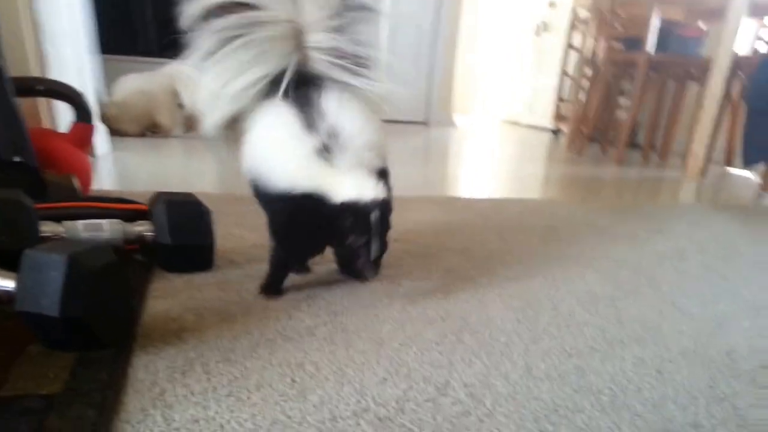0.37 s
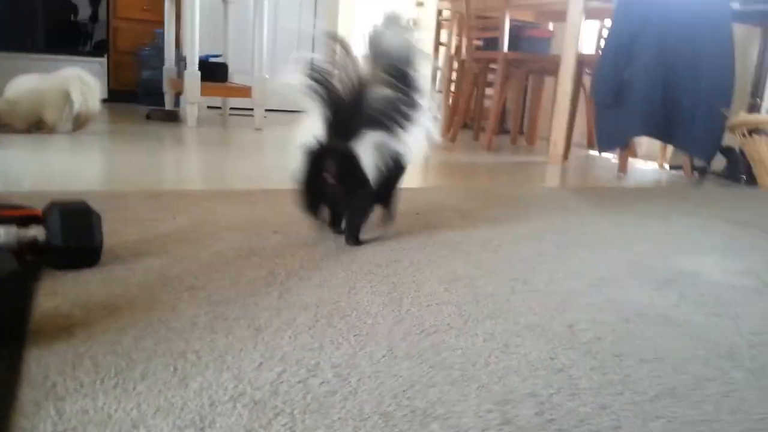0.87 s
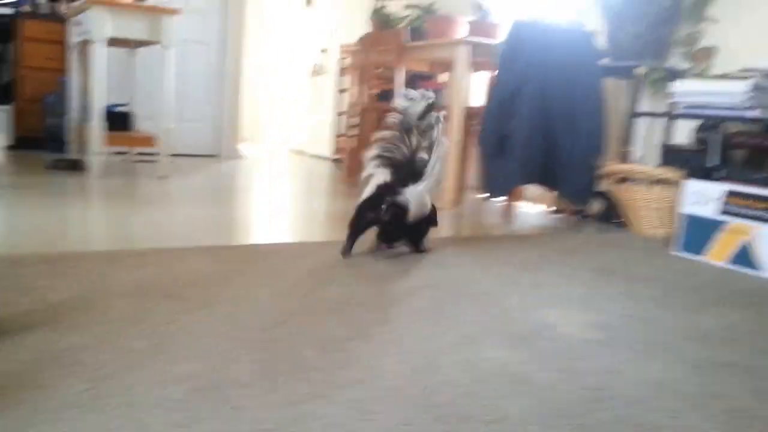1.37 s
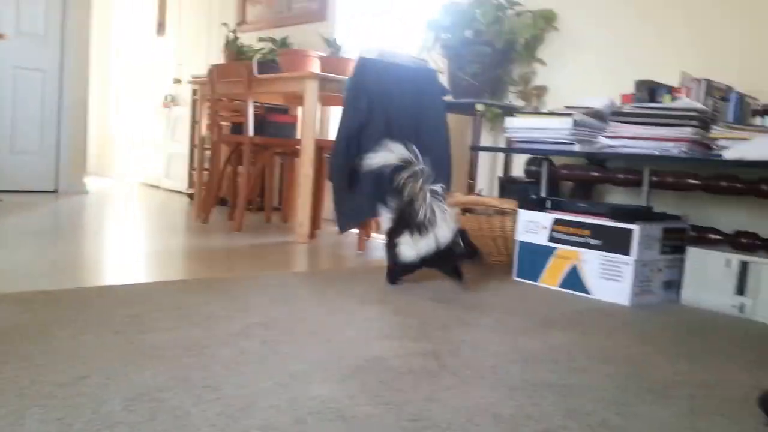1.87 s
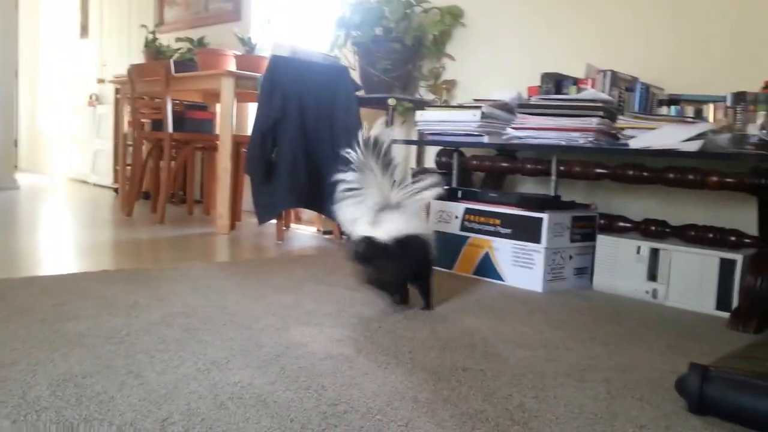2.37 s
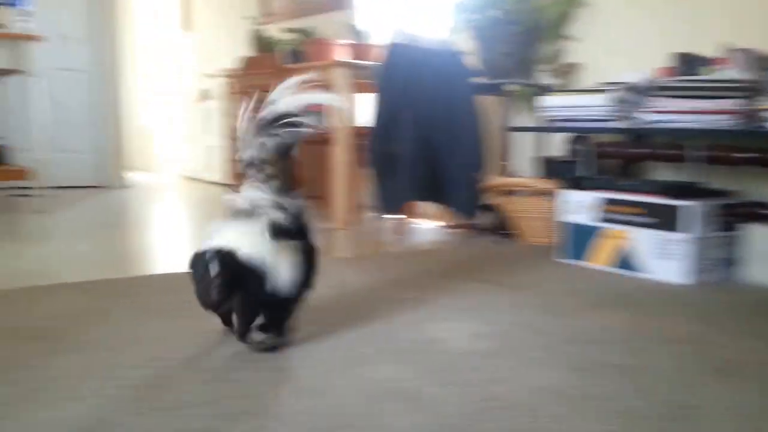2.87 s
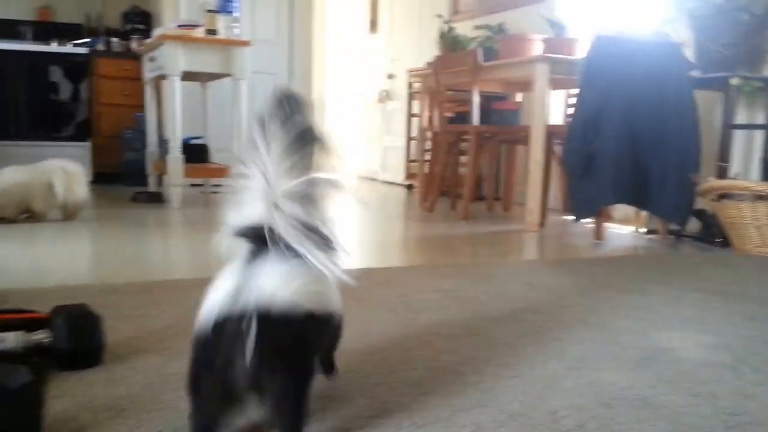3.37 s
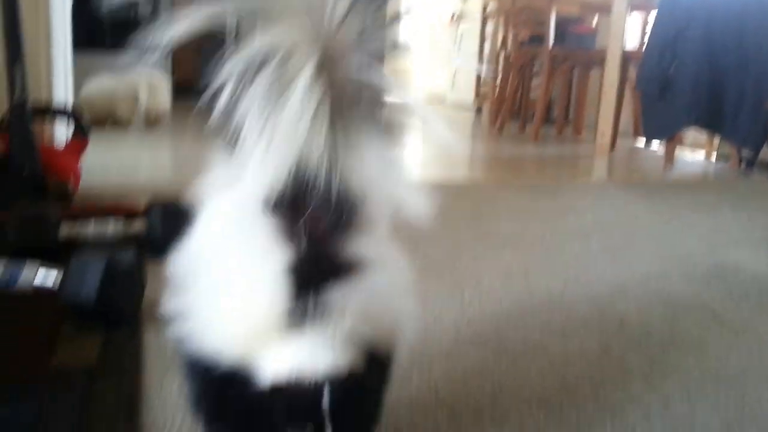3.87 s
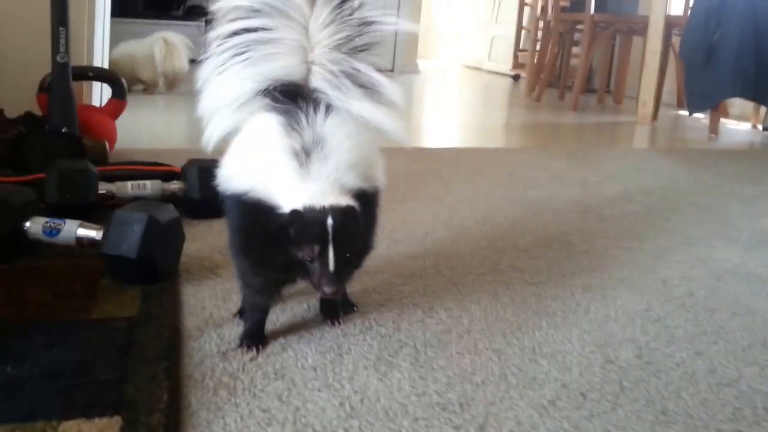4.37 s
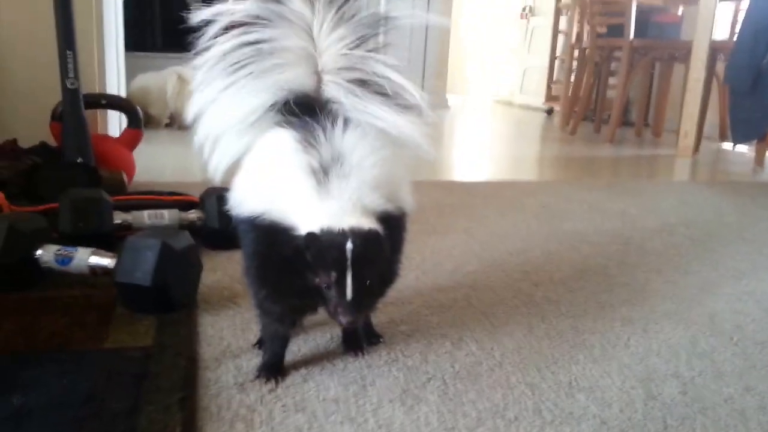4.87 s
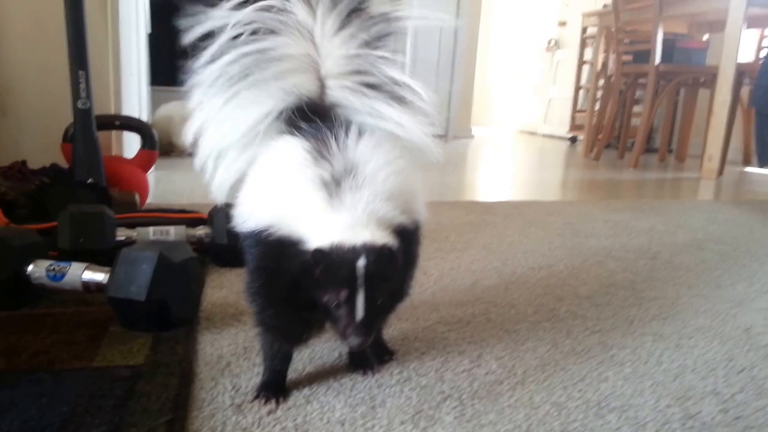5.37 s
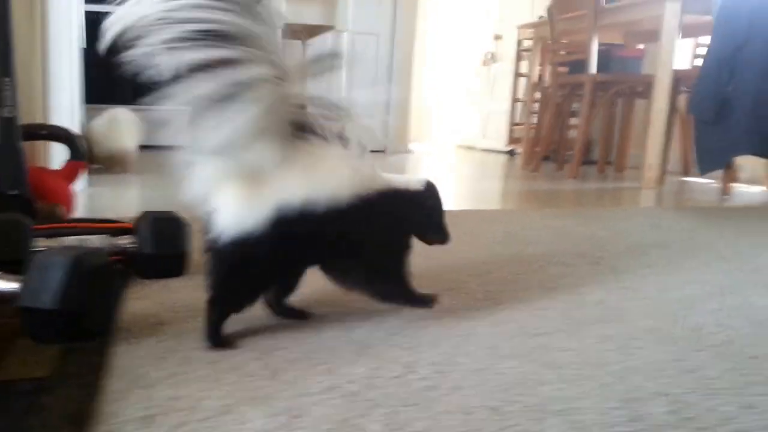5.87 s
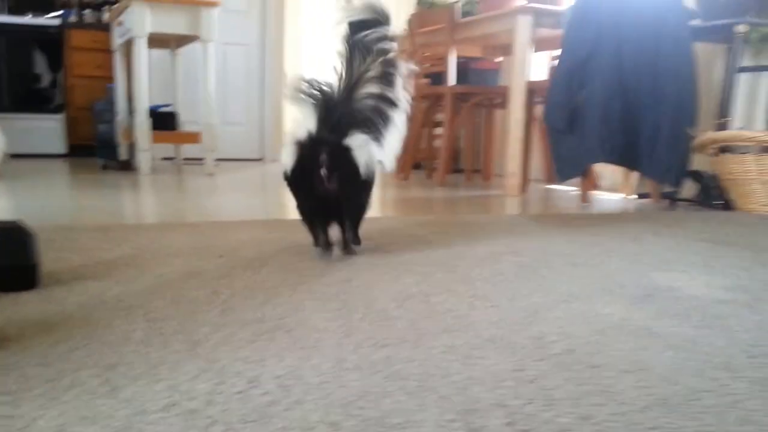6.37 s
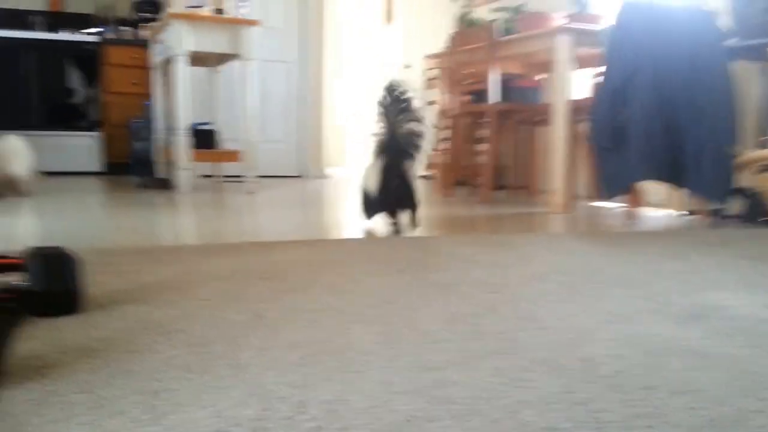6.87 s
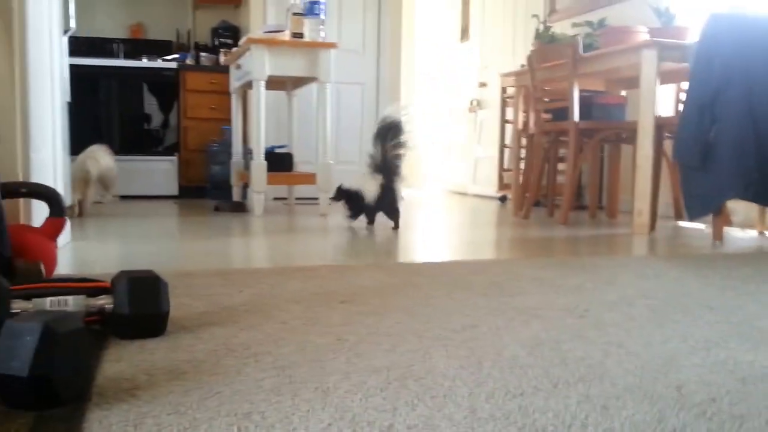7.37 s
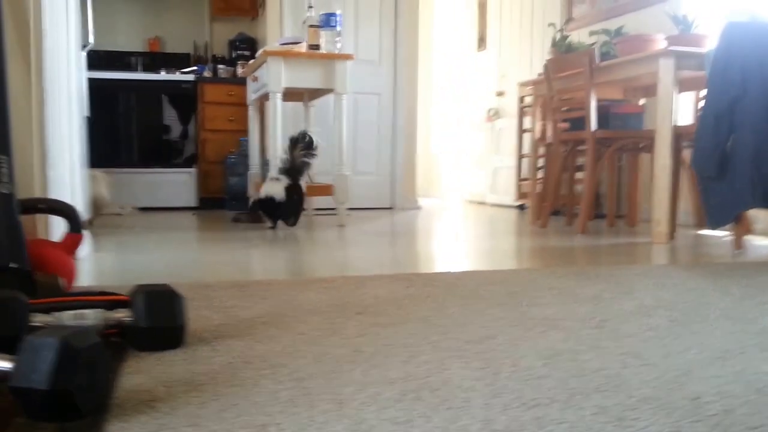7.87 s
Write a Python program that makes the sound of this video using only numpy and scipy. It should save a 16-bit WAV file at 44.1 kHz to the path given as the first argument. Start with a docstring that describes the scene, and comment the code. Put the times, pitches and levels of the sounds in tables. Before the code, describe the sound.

Close to the carpet pile, soft brushing leads into a burst of stomps by a small animal, the loudest just after one second. Smaller double thumps follow, then mostly quiet with a scuff and faint cloth-like rubbing. A second burst of woody thumps comes past six seconds, trailing into dry claw ticks and scrapes. Short indoor echoes, low hush.

```python
"""The low hush of a quiet living room and soft scuffs on carpet: shaped noise, rising and fading.
Then soft blows thump the wooden floor under the carpet: bending waves bring the treble first,
the boom last, and each blow leaves an echo. Paws and cloth rub the pile in four noise layers:
drag, rasp, scratch and fizz. Clicks, the sharp crack of some blows and claw ticks, are tiny
noise bursts around a pitch. The microphone is close to the pile."""
import sys
import numpy as np
from scipy import signal
from scipy.fft import rfft, irfft, next_fast_len
from scipy.io import wavfile
from scipy.ndimage import uniform_filter1d, map_coordinates

SR = 44100
rng = np.random.default_rng(int(sys.argv[2]) if len(sys.argv) > 2 else 0)


def magnitude_from_level(level_db):
    """Linear magnitude for a level in decibels (20 dB per decade)."""
    exponent = np.asarray(level_db, float) / 20
    return 10 ** exponent


def waveform_to_disk(signal):
    """Save audio, clipped to [-1, 1], as 16-bit WAV at the path in sys.argv[1]."""
    frames = np.transpose(np.atleast_2d(signal))
    scaled = np.clip(frames, -1, 1) * 32767
    samples = np.round(scaled).astype(np.int16)
    wavfile.write(sys.argv[1], SR, samples)


N = 363825  # samples in the scene
STEP = 32  # samples between points of a loudness curve

# Blows on the floor; the levels are relative:
# start_s, level_db, boom_db, body_db, knock_hz, echo_db
BLOWS = [(0.267, -45, -5, 2, 300, -16), (.815, -49, 1.5, 10, 280, -9),
         (1.051, -21.5, -26.5, -5.5, 354, -24), (1.064, -16.5, -51, -5.5, 307, -21),
         (1.287, -1, -18, -1, 253, -17.5), (1.459, -5.5, -12, -1.5, 267, -19.5),
         (1.654, -43, -12, -1.5, 302, -3.5), (1.954, -28.5, -17, -7.5, 373, -7),
         (1.974, -41.5, -20, 3, 412, -11), (2.548, -36.5, -17, -12.5, 308, -11),
         (2.694, -40.5, -23, -12, 344, -8), (2.799, -14.5, -25.5, -14.5, 420, -8.5),
         (2.81, -14, -41, -36, 490, -13.5), (2.821, -20, -31, -34, 360, -17),
         (3.083, -41, -18, 2.5, 340, -8.5), (3.421, -40, -15, 3, 425, -13),
         (3.426, -23.5, -37, -9.5, 273, -11.5), (3.66, -19.5, -23, -11, 340, -15),
         (3.672, -18.5, -15.5, -14, 313, -11), (6.284, -18, -7.5, 3, 276, -13.5),
         (6.448, -21.5, -1, 4.5, 355, -15), (6.456, -14, -10, 1.5, 274, -17),
         (6.621, -9, -15, -6, 286, -18), (6.799, -24, -15, -4, 345, -11),
         (6.821, -41, -10, -13.5, 334, -15), (6.9, -44.5, -15, 9, 458, -9),
         (7.136, -49.5, -5, 7.5, 300, -14), (7.17, -50, -6, 5.5, 300, -8)]


def along(points, hz):
    """Reads a curve of (Hz, value) points on a logarithmic pitch axis."""
    point_hz, value = np.transpose(points)
    return np.interp(np.log(hz + 1), np.log(point_hz + 1), value)


def noise(spectrum, patchy_db, gritty_db):
    """Coloured noise of rms 1, with patches of random gain and a grit of uneven fibres."""
    grit = map_coordinates(rng.standard_normal(N // 40 + 4), [np.arange(N) / 40])
    white = rng.standard_normal(N) * magnitude_from_level(gritty_db * grit)
    cells = signal.stft(white, nperseg=512)[2]
    # Smooth the random gains over pitch, then over time
    patches = uniform_filter1d(rng.standard_normal(cells.shape), 6, 0)
    patches = uniform_filter1d(patches, 8, 1)
    patchy = signal.istft(cells * magnitude_from_level(patchy_db * patches / patches.std()), nperseg=512)[1][:N]
    size = next_fast_len(N + 8192)
    colour = magnitude_from_level(along(spectrum, np.fft.rfftfreq(size, 1 / SR)))
    coloured = irfft(rfft(patchy, size) * colour, size)[:N]
    return coloured / coloured.std()


def room_hush():
    """The steady background: faint noise, strongest in the bass."""
    # Colour of the hush: pitch_hz, relative level_db
    hush_colour = [(18, -67), (30, -29), (118, -8.5), (209, -8), (325, -11), (589, -14), (653, -16),
                   (725, -18.5), (1580, -22), (2930, -25.5), (3340, -25.5), (6050, -31), (14600, -27.5)]
    return magnitude_from_level(-54.5) * noise(hush_colour, patchy_db=0.7, gritty_db=0.8)


def stroke(start_s, db, rise_s, hold_s, fall_s):
    """Power along time: 20 dB up in rise_s, full from start_s for hold_s, 20 dB down in each fall_s."""
    # With a negative fall_s the last corner comes early, and the stroke is cut off there
    end_s = start_s + hold_s
    corners = [start_s - 5 * rise_s, start_s, end_s, end_s + 5 * fall_s]
    return magnitude_from_level(2 * np.interp(np.arange(0, N, STEP) / SR, corners, [db - 100, db, db, db - 100]))


def layer_power(*layer_db):
    """Turns a level for each rubbing layer into a column of power factors."""
    return magnitude_from_level(2 * np.array(layer_db)[:, None])


def cloth_rub():
    """One long slow rub of cloth: its level and brightness wander between set points."""
    # Points of the rub: time_s, level_db, brightness_db (added to scratch and fizz)
    rub_points = [(4.3, -68, 1), (4.42, -61.5, -4), (4.66, -63, -6), (4.78, -53.5, -5), (5.05, -50, -2),
                  (5.11, -54.5, 2), (5.19, -51.5, 0.5), (5.42, -54, 1.5), (5.47, -52, 1.5),
                  (5.85, -55.5, 2.5), (5.94, -63.5, 2.5), (6.2, -64, -6), (6.3, -72, -6)]
    # Level added to each layer: drag_db, rasp_db, scratch_db, fizz_db
    rub_colour = (-2.5, -0.5, -1, -6)
    point_s, *columns = np.transpose(rub_points)
    time = np.arange(0, N, STEP) / SR
    level_db, bright_db = [np.interp(time, point_s, column, -120, -120) for column in columns]
    brightness = np.outer([0, 0, 1, 1], bright_db)
    return magnitude_from_level(2 * (level_db + np.array(rub_colour)[:, None] + brightness))


def add_sweeps(power):
    """Soft sweeps over the pile rise and fade equally fast; the drag comes a little late."""
    # start_s, hold_s, fade_s (per 20 dB), rasp_db, drag_db and scratch_db (both over the rasp)
    sweeps = [(0.0, 0.044, 0.11, -47, -4.5, -2), (0.148, 0.0065, 0.027, -51, -11, -7),
              (0.234, 0.039, 0.058, -39.5, 7, -6), (0.368, 0.018, 0.033, -54, -1.5, -3.5),
              (.55, 0.023, 0.036, -53.5, -1.5, -6), (.65, 0.16, 0.13, -41, -5, -7),
              (.81, 0.055, 0.063, -42.5, 2, -7.5), (2.44, .01, 0.02, -66.5, -5, 5),
              (2.574, 0.0079, .08, -63.5, 0, -1), (2.845, 0.031, 0.059, -47.5, 3, -24),
              (3.565, 0.014, 0.05, -65, 7, -1), (3.9, 0.011, 0.36, -58, -3, -2.5),
              (4.172, 0.048, 0.041, -38, 3.5, -4.5), (4.27, .02, .08, -61, 9, -1),
              (6.513, 0.0078, 0.036, -45.5, -4, -5), (6.708, 0.019, 0.041, -47.5, -11, -3.5),
              (6.85, 0.007, 0.069, -49, 3, -3.5), (7.0, 0.086, 0.27, -45.5, -3, -4),
              (8.12, 0.06, .1, -70, 6.5, -6)]
    drag_lag_s, fizz_over_scratch_db = 0.01, -6
    for start_s, hold_s, fade_s, db, drag_db, scratch_db in sweeps:
        power[0] += stroke(start_s + drag_lag_s, db + drag_db, fade_s, hold_s, fade_s)
        balance = layer_power(0, scratch_db, scratch_db + fizz_over_scratch_db)
        power[1:] += stroke(start_s, db, fade_s, hold_s, fade_s) * balance


def add_scrapes_and_skids(power):
    """Bright scrapes: most swell slowly, one starts at once. Skids of a catching claw start fast."""
    # Scrapes: start_s, rise_s and fall_s (per 20 dB), scratch_db, fizz_db (over the scratch)
    scrapes = [(4.485, 0.07, 0.3, -67.5, 4), (4.57, 4, -0.66, -58, 12), (6.06, 0.5, 0.6, -57.5, -4.5),
               (7.33, 0.9, 0.25, -53.5, 0), (7.755, 0.15, 0.5, -58.5, -3), (7.82, 0.3, 0.3, -59, 2),
               (7.98, 0.05, 0.2, -49.5, 1), (8.05, 0, .15, -48.5, -2.5)]
    # Skids: start_s
    skid_starts = [3.992, 6.771, 6.9, 7.168, 7.455, 7.668, 7.94]
    # Skids, one row per start: hold_s, fall_s (per 20 dB), scratch_db, fizz_db (over the scratch)
    skids = [(0.035, 0.12, -46.5, -3.5), (0.019, .05, -57, 4.5), (0.021, .13, -45.5, 1),
             (0.032, 0.25, -44.5, -1.5), (0.029, 0.15, -48, -2.5), (0.017, -0.7, -62, 0),
             (.015, 0.15, -52, -2.5)]
    scrape_hold_s, skid_rise_s = 0.019, 0.002
    drag_db, rasp_db = -11.5, -12.5  # over the scratch
    scrape_strokes = [(start, rise, scrape_hold_s, *rest) for start, rise, *rest in scrapes]
    skid_strokes = [(start, skid_rise_s, *rest) for start, rest in zip(skid_starts, skids)]
    for start_s, rise_s, hold_s, fall_s, db, fizz_db in scrape_strokes + skid_strokes:
        power += stroke(start_s, db, rise_s, hold_s, fall_s) * layer_power(drag_db, rasp_db, 0, fizz_db)


def add_brushes(power):
    """The pile springs back after each blow, louder after harder and fuller blows."""
    # Level of each layer: rasp_db, scratch_db, fizz_db
    brush_colour = (2.8, 0, -1.67)
    after_s, rise_s, fall_s = 0.0077, 0.022, 0.19  # rise and fall per 20 dB
    for start_s, db, _, body_db, *_ in BLOWS:
        brush_db = -45.5 + 0.58 * db + 0.14 * body_db
        power[1:] += stroke(start_s + after_s, brush_db, rise_s, 0, fall_s) * layer_power(*brush_colour)


def rubbing():
    """Gain per sample of drag, rasp, scratch and fizz; strokes add in power."""
    power = cloth_rub()
    add_sweeps(power)
    add_scrapes_and_skids(power)
    add_brushes(power)
    return [np.interp(np.arange(N), np.arange(0, N, STEP), layer) for layer in np.sqrt(power)]


def scuffs():
    """Fibres rubbed by paws and cloth: a low drag, a rasp, a scratch and a fine fizz."""
    # Colours of the four layers, from low to high: pitch_hz, relative level_db
    drag_colour = [(50, -42), (90, -18.5), (180, -3), (330, 4.5), (550, 0.5), (750, -1), (1200, -34)]
    rasp_colour = [(450, -27), (750, -1), (1250, -2), (1600, -6.5), (2000, -8), (3200, -24.5)]
    scratch_colour = [(1100, -9), (1900, -4), (2600, -2), (3300, -2.5), (4200, -2.5), (5200, -5.5),
                      (8000, -26)]
    fizz_colour = [(3500, -6), (5500, -1.5), (7500, 2.5), (10000, 0), (14500, -8)]
    drag, rasp, scratch, fizz = rubbing()
    low = drag * noise(drag_colour, patchy_db=3.0, gritty_db=0.5)
    low = low + rasp * noise(rasp_colour, patchy_db=1.66, gritty_db=1.5)
    high = scratch * noise(scratch_colour, patchy_db=2.1, gritty_db=0.5)
    high = high + fizz * noise(fizz_colour, patchy_db=0.8, gritty_db=1.0)
    return low + high


def clicks():
    """The sharp crack of some blows, and claw ticks: noise of a few milliseconds around a pitch."""
    # Cracks and ticks: start_s, level_db (before the filter), pitch_hz, t60_s (time to fall 60 dB)
    short_clicks = [(1.2882, -5, 2300, 0.0062), (1.459, -28.5, 2800, 0.015), (3.6603, -35, 2200, .006),
                    (3.991, -30.5, 4500, 0.0058), (6.2115, -46, 3500, .006), (6.285, -28.5, 1970, .008),
                    (6.4505, -25, 2100, 0.0065), (6.4553, -36, 2000, .006), (6.6202, -29, 2290, 0.0071),
                    (6.771, -41, 6460, 0.0043), (6.8980, -31, 8060, 0.0027), (7.1672, -27.5, 9000, 0.0033),
                    (7.454, -31.5, 5600, 0.0057), (7.6670, -44, 5000, 0.0048), (7.9390, -35, 4000, .004)]
    size = 2 ** 10
    out = np.zeros(N + size)
    t, f = np.arange(size) / SR, np.fft.rfftfreq(size, 1 / SR)
    for start_s, db, hz, t60 in short_clicks:
        click = rng.standard_normal(size) * magnitude_from_level(-60 * t / t60) * (1 - np.exp(-t / 0.000206))
        broad = 1j * f * hz * 1.48 / (hz * hz - f * f + 1j * f * hz * 0.5)
        no_bass = f ** 2 / (f ** 2 + 1600 ** 2)
        out[round(start_s * SR):][:size] += magnitude_from_level(db) * irfft(rfft(click) * broad * no_bass)
    return out[:N]


def room_tail(size):
    """A fresh echo tail of energy 1; each frequency dies at its own speed."""
    # How long echoes last: pitch_hz, t60_s (time to fall 60 dB)
    echo_times = [(100, 0.26), (400, 0.34), (1500, 0.23), (8000, 0.085)]
    hz, t, cells = signal.stft(rng.standard_normal(size), SR, nperseg=512)
    fading = cells * magnitude_from_level(-60 * t / along(echo_times, hz)[:, None])
    tail = signal.istft(fading, SR, nperseg=512)[1][:size]
    tail = tail * np.clip(np.arange(size) / SR / 0.005, 0, 1)  # fades in over 5 ms
    return tail / np.linalg.norm(tail)


def causal(db):
    """The minimum-phase response with these dB on the FFT grid: nothing sounds before the blow."""
    cepstrum = irfft(np.log(magnitude_from_level(db)))
    cepstrum[1:len(db) - 1] *= 2
    cepstrum[len(db):] = 0
    return np.exp(rfft(cepstrum))


def ringing_boards(f):
    """The floor as a sum of resonances; a shorter ring makes a wider peak."""
    # Resonances of the boards: pitch_hz, relative level_db, t60_s (time to fall 60 dB)
    boards = [(63.2, -19, 0.57), (88.3, 14.5, 0.11), (137, -14, 0.3), (148.5, 4, 0.19), (189.1, 3.5, 0.073),
              (217.8, -5.5, 0.091), (322, 4, 0.03), (336, 0, 0.04), (445.6, 0.5, 0.024), (518, 0, 0.032),
              (660, 1, 0.02), (840, 0.5, 0.011), (1225, 0, 0.01), (2200, -3.5, 0.003), (4550, -18, 0.0047)]
    ring = 0
    for k, (hz, db, t60) in enumerate(boards):
        width_hz = np.log(1000) / np.pi / t60
        level = (-1) ** k * magnitude_from_level(db + rng.normal(0, 1))  # each blow excites them a little differently
        ring = ring + level * 1j * f * np.sqrt(width_hz * 30) / (hz * hz - f * f + 1j * f * width_hz)
    return ring


def blow_colour(f, db, boom_db, body_db, knock_hz):
    """The push of one blow: more body means a harder slap, a harder blow is stronger above its knock."""
    slap_db = -12.5 + 0.51 * body_db
    shoulder_db = -3 + 0.32 * db
    points = [(35, boom_db - 17.0), (80, boom_db + 1.5), (180, body_db), (knock_hz, 0),
              (knock_hz + 300, shoulder_db), (1250, slap_db), (2300, slap_db - 5.0), (12000, slap_db - 17)]
    return causal(along(points, f))


def thumps():
    """Each blow rings the boards; low bending waves run slower, so the bass comes last, after a ragged slap."""
    # Tilt of the echoes: pitch_hz, gain_db
    echo_tilt = [(300, 1.5), (800, 0), (2000, 2)]
    size, lead = 2 ** 15, 2 ** 9  # samples
    f, t = np.fft.rfftfreq(size, 1 / SR), np.arange(lead) / SR
    airborne_hz = 600  # above it the sound comes straight through the air
    spread = 0.1607  # delay of a bending wave times the root of its frequency, s sqrt(Hz)
    low = np.minimum(f, airborne_hz)
    bending = spread * (2 * np.sqrt(low) - low / np.sqrt(airborne_hz))
    travel = np.exp(-2j * np.pi * (bending + f * lead / SR))
    treble = f ** 4 / (f ** 4 + 700 ** 4)
    out = np.zeros(N + size)
    for start_s, db, boom_db, body_db, knock_hz, echo_db in BLOWS:
        ring = ringing_boards(f)
        push = blow_colour(f, db, boom_db, body_db, knock_hz) * magnitude_from_level(db + 43)
        # Pads and claws land unevenly over a few milliseconds, which only the treble resolves
        ragged = rng.standard_normal(lead) * t / 0.001 * np.exp(-t / 0.001)
        slap = rfft(ragged / np.linalg.norm(ragged), size)
        contact = np.sqrt(1 - treble) + np.sqrt(treble) * slap
        direct = ring * push * travel * contact
        echo = magnitude_from_level(echo_db + along(echo_tilt, f)) * rfft(room_tail(size=size // 2), size)
        start = round(start_s * SR) - lead
        out[start:start + size] += irfft(direct * (1 + echo), size)
    return out[:N]


def scene():
    """Blows, clicks and scuffs over the hush of the room, in one channel."""
    return (room_hush() + scuffs() + clicks() + thumps())[None]


def top_cut(x):
    """Nothing passes above the cut-off."""
    return signal.sosfilt(signal.butter(12, 15890, fs=SR, output="sos"), x)


def record(dry):
    """The input rounds off peaks near full scale; the microphone drops the top treble."""
    top_hz = 14700
    size = next_fast_len(N + 8192)
    f = np.fft.rfftfreq(size, 1 / SR)
    rounded = dry / (1 + np.abs(dry) ** 8) ** (1 / 8)
    mix = irfft(rfft(rounded, size) * (f < top_hz), size)[:, :N]
    return top_cut(mix)


dry = scene()
out = record(dry)
waveform_to_disk(out)
```